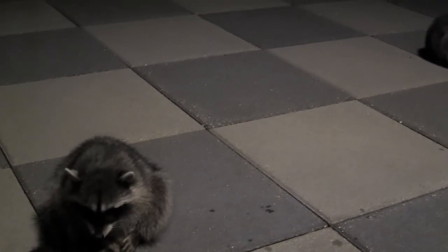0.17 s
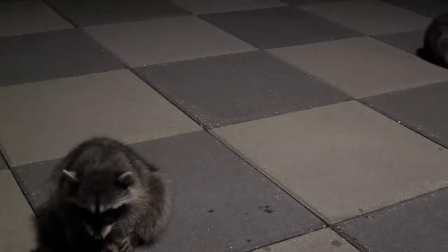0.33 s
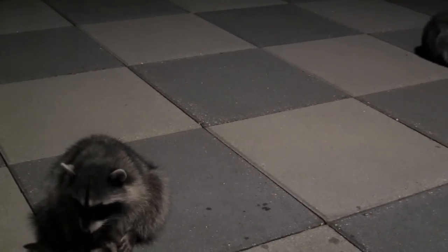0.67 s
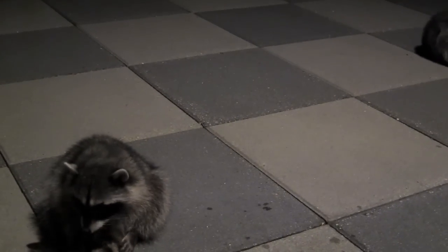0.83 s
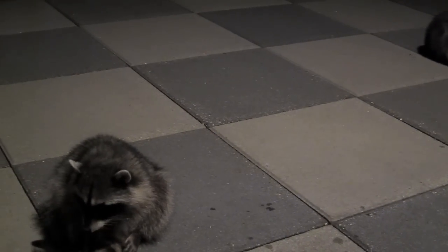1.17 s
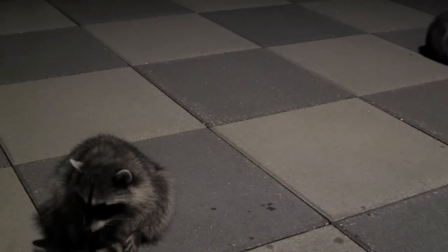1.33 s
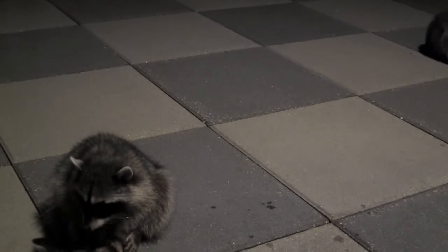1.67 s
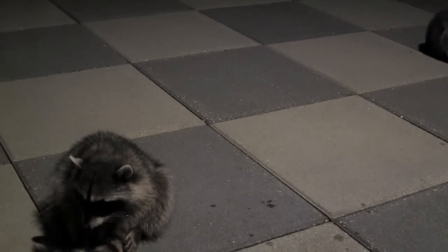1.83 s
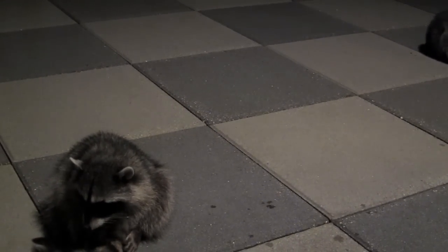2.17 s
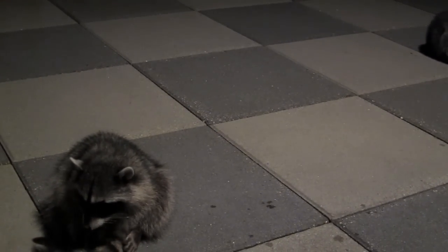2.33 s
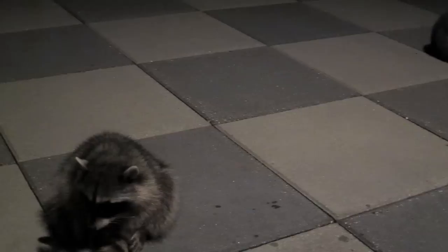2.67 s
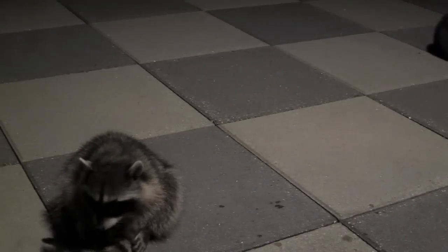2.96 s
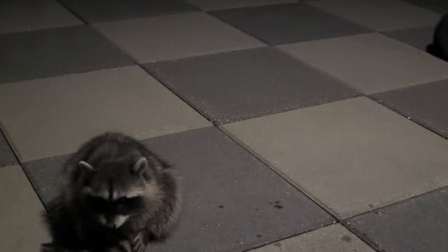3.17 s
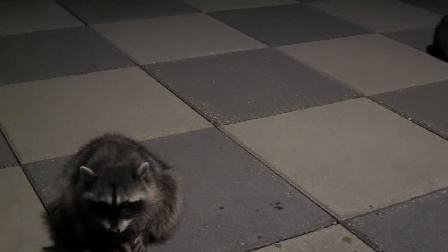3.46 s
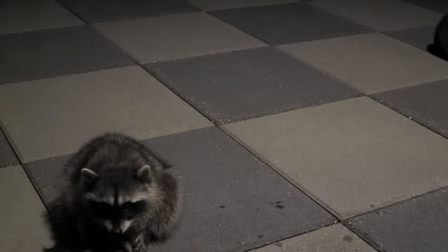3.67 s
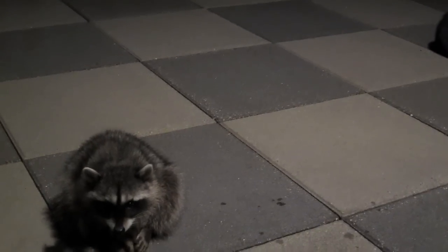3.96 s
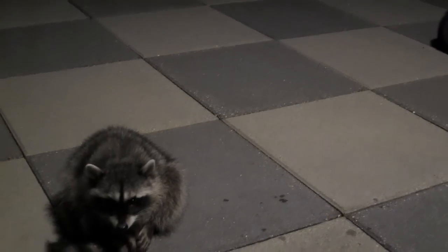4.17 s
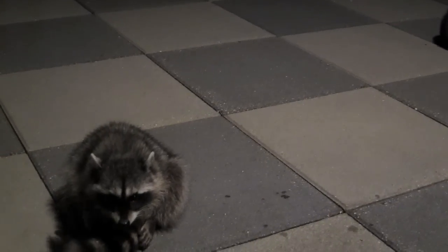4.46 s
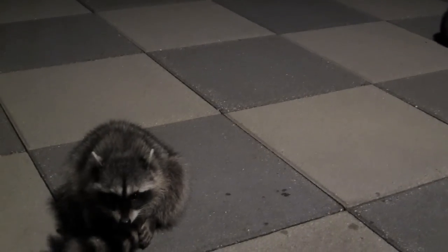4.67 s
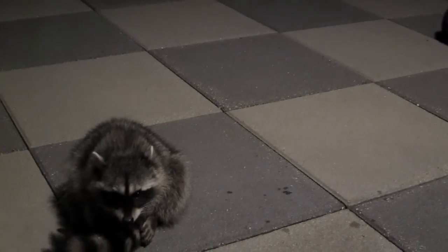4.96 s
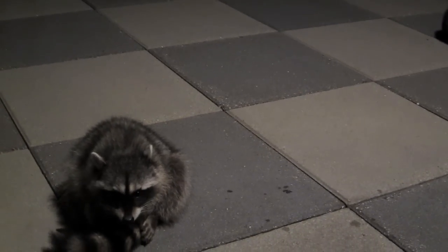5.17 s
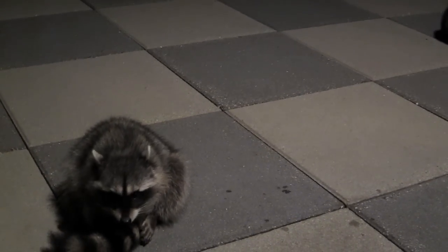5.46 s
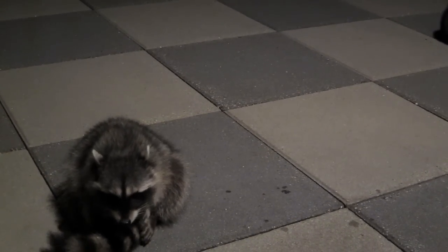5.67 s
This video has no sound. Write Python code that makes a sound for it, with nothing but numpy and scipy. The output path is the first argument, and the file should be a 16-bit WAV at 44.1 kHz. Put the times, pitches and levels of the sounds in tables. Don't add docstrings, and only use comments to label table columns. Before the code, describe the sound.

On a paved terrace, short gliding raccoon notes rattle out in quick groups near a small stereo microphone, the third group longest, with gaps between. After the second come two slow, quiet moans. Once the fourth ends, only low motor hum, a faint wavering whistle, far town noise and a tiny tick remain.

```python
import sys
import numpy as np
from scipy import signal
from scipy.fft import rfft, irfft, next_fast_len
from scipy.io import wavfile
from scipy.ndimage import uniform_filter1d, map_coordinates

SR = 44100
rng = np.random.default_rng(int(sys.argv[2]) if len(sys.argv) > 2 else 0)


def ratio_of_db(decibels):
    return 10 ** (np.asarray(decibels, float) / 20)


def persist_wave(psi):
    counts = np.round(np.clip(psi, -1, 1) * 32767).astype(np.int16)
    wavfile.write(sys.argv[1], SR, np.atleast_2d(counts).T)


N = 256127

# (f/Hz, left-right correlation -1 to 1)
ALIKE = [(60, 0.78), (110, 0.81), (200, 0.91), (380, 0.85), (700, 0.87), (1290, 0.69), (2380, 0.34),
         (4400, -0.032), (8120, -0.23), (15000, 0.48)]


def cubs():
    # (t/s, peak level/dB, opening pitch drop 0-1)
    trill_1 = [
        (0.553, -34.5, .3),
        (0.613, -24, 0.36),
        (0.668, -21.5, 0.26),
        (0.73, -15.5, .14),
    ]
    trill_2 = [
        (1.21, -21, 0.17),
        (1.261, -22, 0.18),
        (1.315, -19, 0.16),
        (1.377, -16.5, 0.17),
        (1.445, -17, 0.22),
        (1.518, -15, 0.18),
    ]
    trill_3 = [(2.567, -20.5, 0.13), (2.616, -35.5, 0.18), (2.666, -23, 0.5), (2.72, -23, 0.38),
               (2.773, -18.5, 0.39), (2.838, -22.5, 0.27), (2.896, -20, 0.21), (2.96, -19.5, 0.16),
               (3.03, -18, 0.207), (3.093, -19, 0.41), (3.166, -15.5, 0.17), (3.237, -16.5, 0.24)]
    trill_4 = [
        (4.055, -22, 0.14),
        (4.114, -23, .25),
        (4.163, -22, 0.19),
        (4.222, -23.5, 0.18),
        (4.283, -19, 0.187),
        (4.351, -18, 0.21),
    ]
    # (first f/Hz, last f/Hz, arch/Hz, end sag 0-1, share of the note the drop lasts)
    glides = [(990, 1003, -6, .09, .4), (1005, 1028, -1, .03, 0.37), (996, 1010, 24.5, .07, 0.453),
              (957, 1015, -10, .13, 0.423)]
    # (first resonance/Hz, last resonance/Hz, second resonance over first,
    # effort that opens the second/dB, nose gain)
    mouths = [(2920, 2930, 1.31, -14, 2.5), (3090, 3190, 1.326, -16, 2.4), (3200, 3360, 1.18, -26, 0.72),
              (3480, 4040, 0.8, -13, 1.1)]
    # (second level/dB, upper level/dB)
    voices = [(-17.5, -20), (-15, -20.5), (-14, -21), (-16.5, -16)]
    trill_jitter = [.012, .011, .018, .017]
    # (t/s, peak level/dB, pitch/Hz, mouth resonance/Hz, second overtone/dB)
    strays = [
        (1.438, -23, 1014, 2820, -10),
        (1.565, -35, 1036, 3130, -13),
        (1.599, -23.5, 1079, 3380, -17),
        (3.021, -22.5, 1016, 3290, -10),
    ]
    # (t/s, peak level/dB, mouth resonance/Hz, second overtone/dB, upper overtones/dB, fall 0-1)
    chirps = [
        (.809, -18, 3130, -9, -15, 0.06),
        (1.662, -15.5, 3570, -4.5, -16.5, 0.06),
        (3.318, -16, 3720, -6, -18, .05),
        (4.431, -17.5, 3620, -8, -19, 0.05),
    ]
    chirp_shapes, chirp_jitter = [(938, .013, 0.03), (984, 0.014, 0.02), (944, 0.02, 0.04),
                                  (942.5, .012, 0.05)], [.012, .01, .004, .022]
    # (t/s, peak level/dB, mouth resonance/Hz, second overtone/dB, upper overtones/dB, fall 0-1)
    moan_rows = [
        (1.8, -26, 3300, -20.5, -26.5, 0.178),
        (1.903, -26, 1930, -14.5, -24, 0.174),
    ]
    # (pitch/Hz, length/s, sag 0-1)
    moan_shapes = [(724, 0.05, 0.03), (676, 0.046, 0.03)]
    # (f/Hz, width/Hz, level/dB)
    throat_bands = [(955, 223, -2), (784, 280, -6), (1305, 42, 0.5), (1672, 440, 4.5), (3080, 2430, -3.5),
                    (4920, 770, -14), (10900, 2000, -11)]
    # (f/Hz, width/Hz, depth 0-1)
    valleys = [(545, 200, 0.77), (2310, 1360, 1), (6170, 2700, 0.61), (14600, 6400, 1)]

    trills = zip((trill_1, trill_2, trill_3, trill_4), glides, mouths, voices, trill_jitter)
    voice = sum(trill(*settings) for settings in trills)
    stray_rows = [(s, db, mouth, second, -31, 0.27) for s, db, hz, mouth, second in strays]
    stray_shapes = [(hz, 0.0105, 0) for s, db, hz, mouth, second in strays]
    voice += quick(stray_rows, stray_shapes, 0.015, bend=0.41, ratio=1.3, open_db=-20, nose=0)
    voice += call_notes(chirps, chirp_shapes, chirp_jitter, breath_db=-8, slope_db=-10.5, lead=1.5, late=0.87,
                        bend=0.49, width_hz=320, open_db=-20, nose=1.14)
    moans = call_notes(moan_rows, moan_shapes, [0.003] * len(moan_rows), breath_db=-20, slope_db=3, lead=1.05,
                       late=0.82, bend=0.189, width_hz=390, open_db=-40, nose=0)

    def throat(f):
        peaks = sum(ratio_of_db(db) * resonance(f, hz, width_hz) for hz, width_hz, db in throat_bands)
        dips = [1 - depth * resonance(f, hz, width_hz) for hz, width_hz, depth in valleys]
        return peaks * np.prod(dips, axis=0)

    return filtered(np.array([voice, moans]), throat)


def trill(beats, glide, mouth, voice, jitter):
    s, db, fall = np.transpose(beats)
    first_hz, last_hz, arch_hz, sag, bend = glide
    first_mouth_hz, last_mouth_hz, *tract = mouth
    u = (s - s[0]) / (s[-1] - s[0])
    effort_db = db + 21
    pitch = first_hz + (last_hz - first_hz) * u + arch_hz * np.sin(np.pi * u)
    mouth_hz = first_mouth_hz + (last_mouth_hz - first_mouth_hz) * u
    second_db = voice[0] + 0.69 * effort_db
    upper_db = voice[1] + 0.21 * effort_db
    rows = list(zip(s, db, mouth_hz, second_db, upper_db, fall))
    shapes = zip(pitch, np.full(len(s), 0.0105), sag * (1 - 0.71 * u))
    return quick(rows, shapes, jitter, bend, *tract)


def quick(rows, shapes, jitter, bend, ratio, open_db, nose):
    return call_notes(rows, shapes, [jitter] * len(rows), breath_db=-11, slope_db=-11, lead=1.3, late=1.25,
                      bend=bend, width_hz=280, open_db=open_db, nose=nose, ratio=ratio)


def call_notes(rows, shapes, jitters, breath_db, slope_db, lead, late, bend, width_hz, open_db, nose,
               ratio=1.293):
    out = np.zeros(N + SR)
    t = np.arange(SR // 10) / SR
    order = np.arange(3, 15)[:, None]
    for row, (hz, length, sag), jitter in zip(rows, shapes, jitters):
        s, db, mouth_hz, second_db, upper_db, fall = row
        u = np.clip(t / length, 0, 1)
        drop = fall * (np.exp(-(u / bend) ** 2) - 0.1)
        pitch = hz * (1 + drop - sag * u + jitter * wobble(960, size=len(t)))
        phase = 2 * np.pi * np.cumsum(pitch) / SR
        second_gain = ratio_of_db(min(0, 2.3 * (db - open_db)))
        bands = [(mouth_hz, 1), (ratio * mouth_hz, second_gain), (5470, nose)]
        favour = 0.16 + sum(gain * np.exp(-((order * pitch - band_hz) / width_hz) ** 2)
                            for band_hz, gain in bands)
        slope = ratio_of_db(slope_db * np.log2(order / 3))
        upper = np.sum(favour * slope * np.sin(order * phase), axis=0)
        breath = ratio_of_db(breath_db) * (1 + np.cos(phase)) * rng.standard_normal(len(t))
        mouth = 2.055 * u ** abs(late)
        rasp = 1 + 6 * jitter * wobble(1407, size=len(t))
        overtones = ratio_of_db(second_db) * np.sin(2 * phase) + ratio_of_db(upper_db + 9) * (upper + breath)
        tone = rasp * np.sin(phase) + mouth * overtones
        envelope = np.abs(np.sin(np.pi * u ** abs(lead))) ** 0.88
        start = round((s - 0.4 * lead * length) * SR)
        out[start:][:len(t)] += ratio_of_db(db - 2) * envelope * tone
    return out[:N]


def small_sounds():
    # (t/s, peak level/dB, f/Hz)
    ticks = [
        (2.0988, -43, 3240),
        (2.2922, -36, 3230),
        (5.1572, -37, 4020),
    ]
    out = np.zeros(N)
    t = np.arange(SR // 50) / SR
    for s, db, hz in ticks:
        decay = ratio_of_db(db - 60 * t / 0.0046)
        strike = np.sin(2 * np.pi * hz * t) + 0.3 * rng.standard_normal(len(t))
        out[round(s * SR):][:len(t)] += decay * strike
    air = unit(filtered(rng.standard_normal(N), lambda f: np.exp(-((f - 10800) / 400) ** 2)))
    u = np.clip((np.arange(N) / SR - 4.635) / 0.095, 0, 1)
    return out + ratio_of_db(-72) * air * np.sin(np.pi * u)


def terrace(x):
    # (delay/s, signed strength, left lag/s)
    walls = [(.00272, -.29, 30e-6), (.00553, -.6, -30e-6), (.01007, .56, 40e-6), (.01243, -.44, -40e-6),
             (.02367, -.13, 50e-6), (.02667, -.45, -60e-6), (.0312, .1, 60e-6), (.0460, .17, 50e-6),
             (.0525, .2, -60e-6)]
    # (f/Hz, t60/s)
    yard = [(500, 0.28), (1000, 0.38), (2000, 0.37), (4000, 0.28), (12000, 0.26)]
    # (f/Hz, level/dB)
    yard_colour = [(500, -20), (1100, -4.5), (1350, -10), (1800, -4.5), (4000, 0.5), (12000, 1)]
    ports = np.array([[0.5], [-0.5]])
    paths = [(0.00011, 1, 0.000072)] + walls
    near = filtered(x, lambda f: sum(gain * np.exp(-2j * np.pi * f * (s + lag * ports))
                                     for s, gain, lag in paths))
    hz, t, z = signal.stft(rng.standard_normal((2, SR // 2)), SR, nperseg=256)
    alike = np.clip(along(ALIKE, hz), -1, 1)[:, None]
    z = np.array([z[0], alike * z[0] + np.sqrt(1 - alike ** 2) * z[1]])
    decay = ratio_of_db(-60 * t / along(yard, hz)[:, None])
    tail = signal.istft(z * decay, SR, nperseg=256)[1]
    tail = tail / np.linalg.norm(tail[0])
    late = signal.fftconvolve(np.pad(x, (650, 0))[None], tail, axes=1)[:, :N]
    return near + filtered(late, lambda f: ratio_of_db(along(yard_colour, f)))


def motor():
    # (t/s, f/Hz, level/dB, casing buzz 0-1)
    shaft = [(0, 102.9, -62, 0), (.39, 102.9, -49.5, 0), (.95, 102.2, -50.5, 0), (1.4, 102.9, -47, 0.42),
             (2.3, 101.8, -48, 1), (2.8, 100.8, -49.5, 0.93), (2.94, 100.6, -55.5, 0.76),
             (3.59, 100.2, -48, 0), (3.82, 100, -50, .9), (4.67, 99.93, -46, .9), (5.03, 100, -46, 0.44),
             (5.4, 99.5, -46, 0.6), (5.81, 100.1, -42, 0.3)]
    # (level/dB, lulls of (t/s, half length/s, gain/dB))
    third_rest_db, lulls = (-56, [(.8, 0.17, -7), (1.9, 0.43, -13), (2.8, .1, -15), (5.7, 0.56, -8)])
    # (order, level/dB)
    orders_up = [(4, -62.5), (5, -64)]
    # (f/Hz, width/Hz, level/dB, surges of (t/s, half length/s, gain/dB))
    duct_hz, duct_width_hz, duct_rest_db, surges = (178, 5.46, -64.5, [(1.6, 0.41, 7.5), (2.5, .6, 11.5),
                                                    (4.1, 0.41, 11), (5.2, 0.43, 11)])
    # (t/s, half length/s, gain/dB)
    draughts = [
        (0, 0.59, 5),
        (2.5, .3, 9),
        (3.3, 0.23, 14),
        (4.1, 0.26, 2),
        (5.85, .4, 13),
    ]
    # (f/Hz, level/dB, width/Hz)
    drones = [(253, -59, 8), (8890, -79, 8.124)]

    shaft_hz, shaft_db, buzz = curves(shaft)
    phase = 2 * np.pi * np.cumsum(shaft_hz) / SR
    second_db = -70 + 19 * buzz
    third_db = third_rest_db + sum(swell(*lull) for lull in lulls)
    levels = [shaft_db] + [db + 1.3 * wobble(2.54) for db in (second_db, third_db)]
    hum = np.zeros(N)
    for k, db in enumerate(levels, 1):
        hum += ratio_of_db(db + 4 + 0.37 * wobble(5.6)) * np.sin(k * phase)
    for k, db in orders_up:
        hum += ratio_of_db(db + 3 + 3 * wobble(2)) * np.sin(k * phase)

    duct_db = duct_rest_db + sum(swell(*surge) for surge in surges)
    whistle_db = -65 + sum(swell(*gust) for gust in draughts)
    vents = [(duct_hz, duct_db, duct_width_hz), (840, whistle_db, 40)]
    for hz, db, width_hz in drones + vents:
        cycles = np.cumsum(hz + width_hz * wobble(25)) / SR
        hum += ratio_of_db(db + 3 + 0.58 * wobble(2.83)) * np.sin(2 * np.pi * cycles)
    return hum


def town():
    # (f/Hz, level per Hz/dB)
    wash_spectrum = [(20, -12), (40, -14.5), (75, -4), (130, -6), (200, -2.5), (330, -5.5), (600, -6.5),
                     (900, -5), (1500, -23), (3000, -35)]
    # (f/Hz, level per Hz/dB)
    hiss_spectrum = [(710, -11.5), (1200, -6), (1920, -6.5), (2310, -6.5), (6060, -10.5), (7600, -19.5),
                     (8190, 4.5), (8550, -18), (8920, -23.5), (13700, -25), (15600, -59)]
    car_db = swell(4.61, 0.33, 2.3)
    wash_db = -48 + car_db + 0.25 * wobble(3)
    hiss_db = -48 + 0.39 * car_db + 0.25 * wobble(2.53)
    wash = ratio_of_db(wash_db) * rush(wash_spectrum, patchy_db=1.5)
    return wash + ratio_of_db(hiss_db) * rush(hiss_spectrum, patchy_db=0.78)


def rush(spectrum, patchy_db):
    z = signal.stft(rng.standard_normal((2, N + 512)), nperseg=512)[2]
    field = uniform_filter1d(rng.standard_normal(z.shape[1:]), 6, 0)
    field = uniform_filter1d(field, 14, 1)
    pair = signal.istft(z * ratio_of_db(patchy_db * unit(field)), nperseg=512)[1][:, :N]

    def spread(f):
        angle = np.arccos(np.clip(along(ALIKE, f), -1, 1)) / 2
        return ratio_of_db(along(spectrum, f)) * [np.cos(angle), np.sin(angle)]

    mid, side = filtered(pair, spread)
    return unit(np.array([mid + side, mid - side]))


def resonance(f, hz, width_hz):
    return 1j * f * width_hz / (hz * hz - f * f + 1j * f * width_hz)


def swell(s, half_s, db):
    return db * np.exp(-((np.arange(N) / SR - s) / half_s) ** 2)


def wobble(rate, size=N):
    knots = rng.standard_normal(int(size * rate / SR) + 4)
    return map_coordinates(knots, [np.arange(size) * rate / SR])


def curves(rows):
    s, *cols = np.transpose(rows)
    return [np.interp(np.arange(N) / SR, s, c) for c in cols]


def along(points, hz):
    f, v = np.transpose(points)
    return np.interp(np.log(hz + 1), np.log(f + 1), v)


def filtered(x, response):
    m = next_fast_len(N + SR // 2)
    return irfft(rfft(x, m) * response(np.fft.rfftfreq(m, 1 / SR)), m)[..., :N]


def unit(x):
    return x / np.sqrt(np.mean(x ** 2) + 1e-20)


def scene():
    calls, moans = cubs()
    echoed = 0.39
    animals = terrace(calls + echoed * moans + small_sounds()) + (1 - echoed) * moans
    return animals + motor() + town()


def roll_off(x):
    return signal.sosfilt(signal.butter(12, 15740, fs=SR, output="sos"), x)


def record(dry):
    # (f/Hz, level/dB)
    gap = [(7000, 0), (7500, -6), (7750, -20), (7950, -50), (8350, -50), (8520, -14), (8700, 0), (13000, 0),
           (14200, -3), (15600, -8), (15750, -80)]
    sides = np.array([[-0.5], [0.5]])

    def ports(f):
        lean_db = along([(1200, 0), (2500, 1.5)], f) * sides
        return ratio_of_db(along(gap, f)) * ratio_of_db(lean_db)

    mix = filtered(dry, ports)
    return roll_off(mix)


dry = scene()
out = record(dry)
persist_wave(out)
```